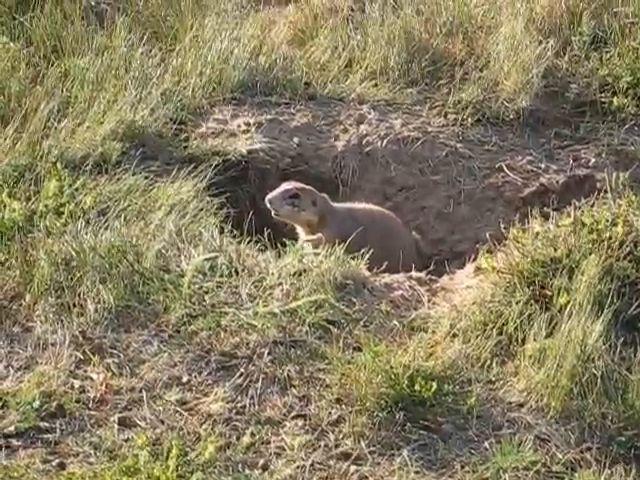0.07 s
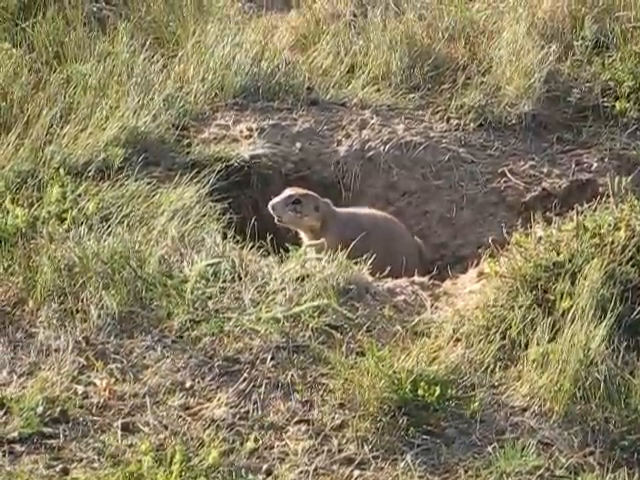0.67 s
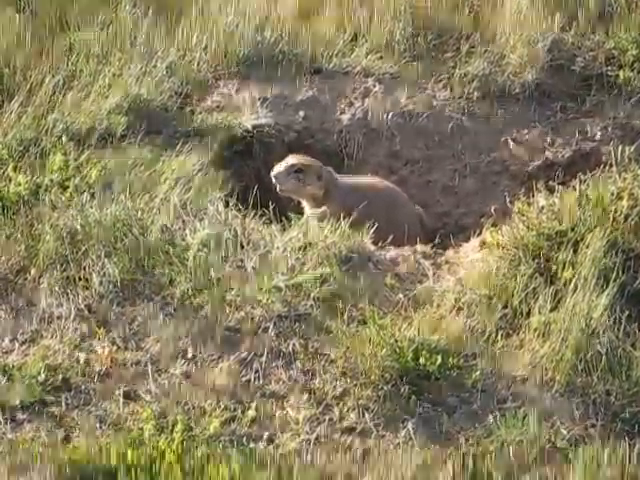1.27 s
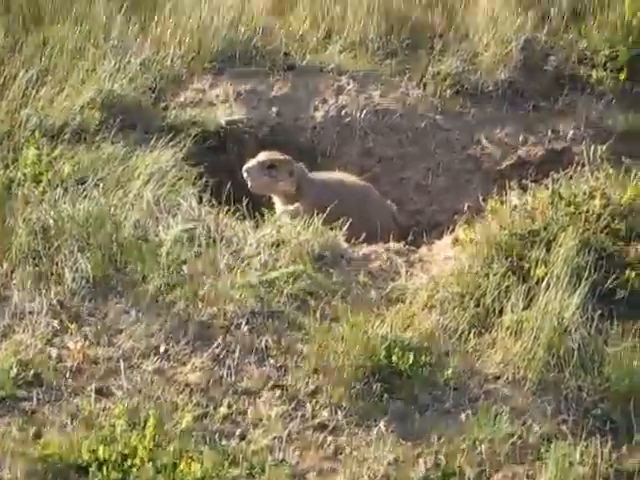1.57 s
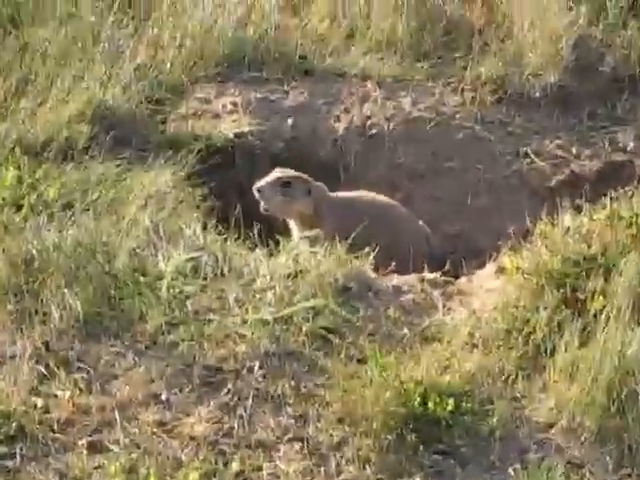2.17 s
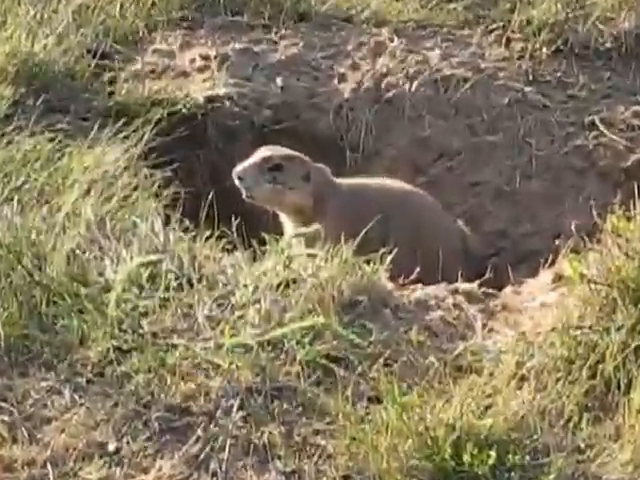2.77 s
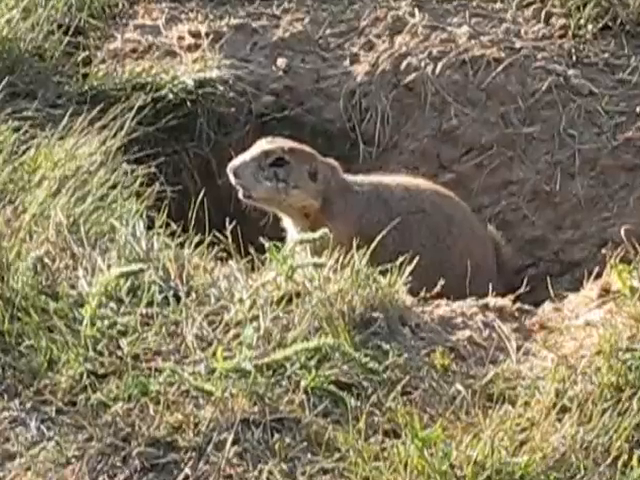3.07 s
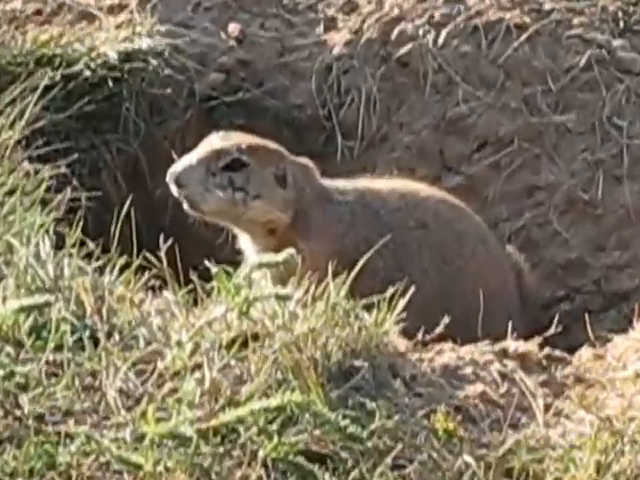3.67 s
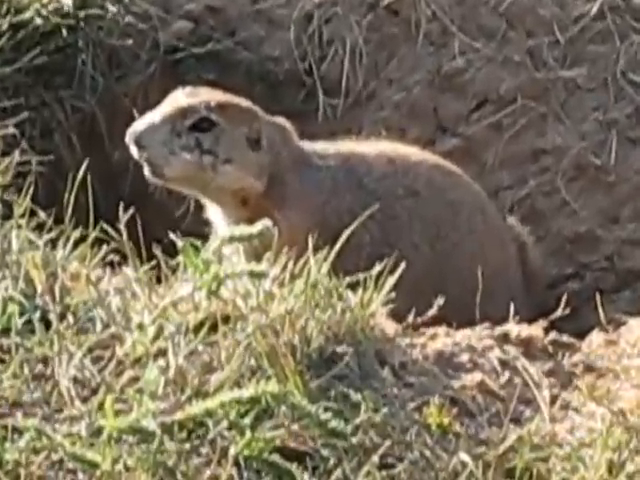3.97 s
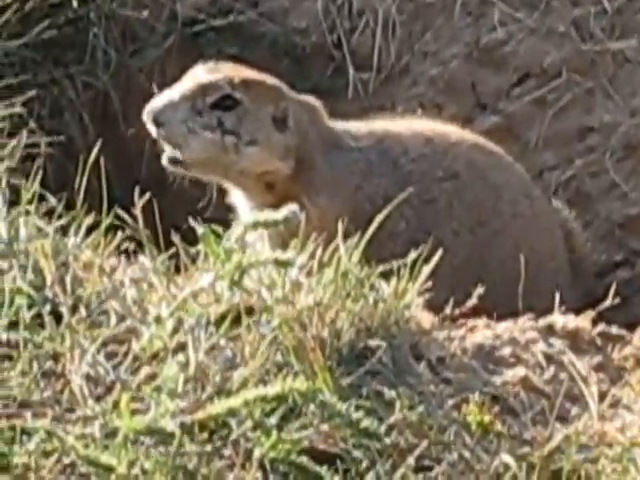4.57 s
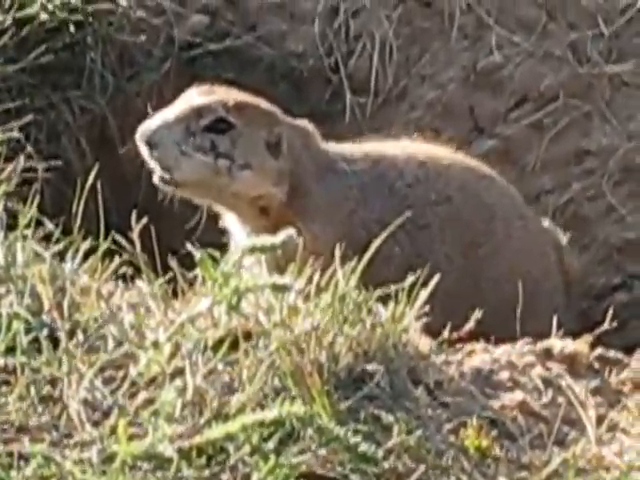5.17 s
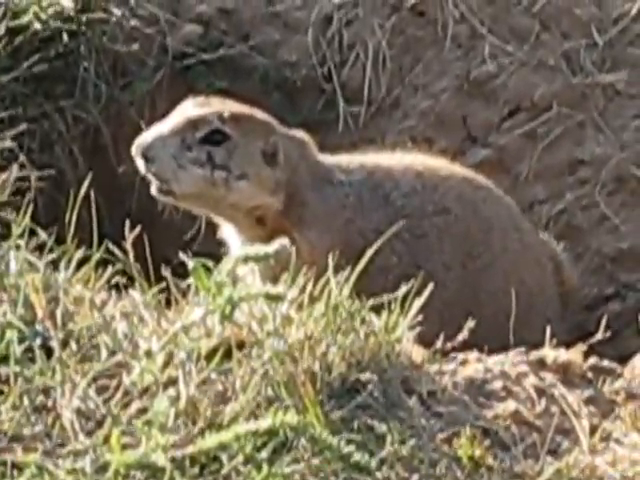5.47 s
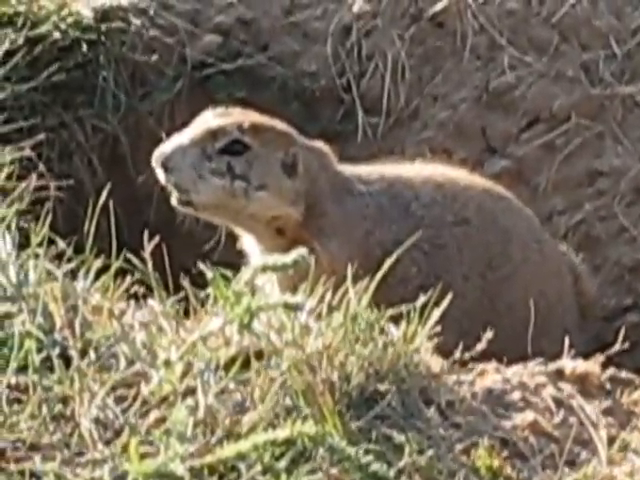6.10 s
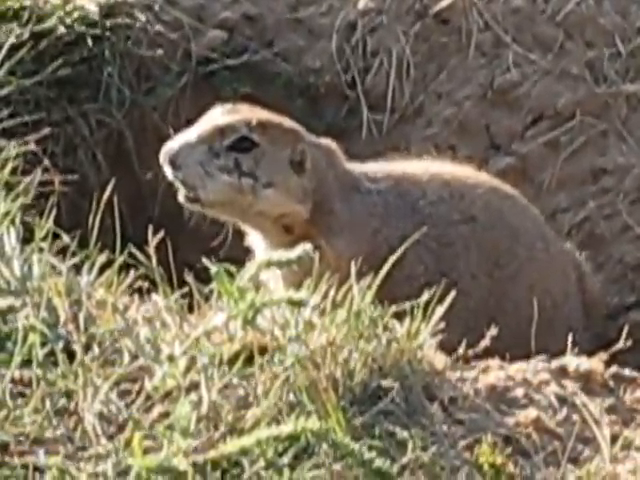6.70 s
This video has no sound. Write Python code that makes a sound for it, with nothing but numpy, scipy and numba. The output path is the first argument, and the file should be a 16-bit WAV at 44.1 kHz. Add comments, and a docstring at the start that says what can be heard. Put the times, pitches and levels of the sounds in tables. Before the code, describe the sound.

Gusty wind rumbles and bumps against a hand-held camera's microphone in a grassy field, then gradually dies down. Throughout, two prairie dogs at a burrow exchange short, high-pitched barks, one rough and one clean, with a slight outdoor echo. Early on there is a soft dry scuff, then a close click and rub from the camera. Barely audible crickets sit behind the wind.

```python
"""Prairie dogs in the wind

Two prairie dogs bark in turn at a burrow: one in clear, arched yips, the other with a fluttering rasp.
Wind rushes over the grassland and thumps on the microphone; two crickets trill faintly with their wings.
The hand-held camera clicks and zooms, and there is one dry scuff.
The camera's limiter flattens the barks and its filter cuts a notch in the treble."""
import sys
import numpy as np
from scipy import signal
from scipy.fft import rfft, irfft
from scipy.io import wavfile
from scipy.ndimage import uniform_filter1d
from numba import njit

SR = 44100
rng = np.random.default_rng(int(sys.argv[2]) if len(sys.argv) > 2 else 0)


def log_audio(samples):
    """Write samples as a 16-bit WAV file to the path given in sys.argv[1]."""
    # one column per channel
    frames = np.atleast_2d(samples).T
    # limit to full scale, then quantise
    limited = np.clip(frames, -1, 1)
    pcm = np.round(limited * 32767).astype(np.int16)
    wavfile.write(sys.argv[1], SR, pcm)


N = 301644
TIME = np.arange(N) / SR

# wind over the grassland, swelling once and dying down: t/s, level/dB
BREEZE_LEVEL = [(0, -34), (1.85, -32.5), (2.3, -34), (3, -36), (3.6, -39), (4.7, -41.5), (5.3, -42.5),
                (6.2, -41.5), (6.84, -45.5)]
# colours of the wind bed: f/Hz, level/dB
RUSH_COLOUR = [(200, -8), (380, -9.5), (600, 0.5), (880, 7), (1150, 0.5), (1500, 3), (1800, -2.5),
               (2200, -12.5), (2800, -17), (4500, -27.5), (7000, -43), (12000, -59)]  # body of the rush in the grass
SWELL_COLOUR = [(1100, -16), (1450, 6), (1780, 4), (2050, -9), (2400, -8), (3200, -36), (7000, -34)]  # its bright edge, which grows fastest in a swell
HISS_COLOUR = [(1500, 2), (4500, -2), (6700, 1), (8500, -5.5), (10000, -4.5), (12500, -7), (17000, -14)]  # steady hiss
RUMBLE_COLOUR = [(15, 0), (30, -16.5), (60, -5.5), (100, -13.5), (150, -23.5), (300, -41)]  # light air on the microphone
BUFFET_COLOUR = [(20, -8.5), (55, -3.5), (110, 0), (200, -8.5), (350, -15), (600, -22), (1200, -62)]  # turbulence on the microphone
# gusts at the microphone: t/s, level/dB
GUST_LEVEL = [(0, -19), (.2, -29.5), (.65, -30.5), (.99, -24.5), (1.35, -32), (1.6, -36), (2.1, -33),
              (2.45, -44.5), (3, -39), (3.55, -34), (3.9, -41), (4.7, -42), (4.97, -30.5), (5.3, -33),
              (5.45, -44), (6.1, -53.5), (6.84, -54)]
# the strongest eddies that thump on the microphone: t/s, level/dB, f/Hz
EDDY_THUMPS = [(.032, -13.5, 112), (.064, -4.5, 302), (.414, -10.5, 278), (.482, -8, 323),
               (.556, -5.5, 336), (.587, -9, 273), (.614, -11, 290), (.778, -7, 222), (.868, -7, 282),
               (.935, -4, 303), (.989, -5, 151), (1.132, -4.5, 302), (1.183, -8, 225), (1.337, -5, 260),
               (1.461, -5.5, 303), (1.498, -2, 330), (1.725, -7, 172), (1.952, -9.5, 315), (2.158, -7, 295),
               (2.281, -5, 460), (2.621, -12, 308), (2.827, -11, 150), (2.94, -12, 132),
               (2.971, -11.5, 230), (3.11, -11, 218), (3.17, -12.5, 187), (3.522, -10.5, 200),
               (3.576, -11.5, 191), (3.599, -8, 307), (3.913, -18, 116), (4.837, -12.5, 323),
               (4.989, -11, 170), (5.055, -13, 240), (5.102, -11.5, 360), (5.216, -13, 228),
               (5.347, -10, 182), (5.639, -15.5, 202), (6.33, -24.5, 206), (6.714, -25, 139)]
# rests of the higher cricket: start/s, end/s
TRILL_RESTS = [(.7, 2), (5.3, 6.48)]
# rasping barks: t/s, length/s, top f/Hz, place of the top/0-1, level/dB, brightness/(dB per octave),
# flutter/Hz, late pitch drop/0-1
RASP_CALLS = [(.133, 0.066, 1860, 0.31, -15, -0.5, 210, 0.14),
              (0.672, 0.075, 1786, 0.31, -18.5, 1, 234, .02), (1.676, 0.074, 1787, .41, -19, .5, 176, 0.03),
              (2.529, .074, 1800, 0.39, -18.5, -1, 188, 0), (3.048, 0.077, 1740, 0.34, -19, 0, 207, 0),
              (3.604, .076, 1773, 0.32, -18, -1.5, 224, 0), (4.57, 0.069, 1752, .4, -18.5, 1, 190, 0.01),
              (5.474, 0.072, 1704, 0.42, -17.5, 0, 263, 0.06), (6.154, 0.072, 1747, 0.32, -19, -1, 186, 0),
              (6.809, 0.09, 1738, 0.2, -19, 0, 194, 0)]
# clear yips: t/s, length/s, top f/Hz, place of the top/0-1, level/dB, brightness/(dB per octave)
YIP_CALLS = [(0.486, 0.062, 1885, 0.22, -19.5, 5.5), (1.503, 0.066, 1850, 0.5, -18.5, 4),
             (2.167, 0.068, 1938, 0.29, -20, 9.5), (3.256, 0.064, 1860, 0.31, -20, 3.5),
             (4.102, 0.069, 1871, 0.48, -17.5, 7.5), (4.629, 0.074, 1747, 0.37, -19, 0),
             (5.093, 0.067, 1854, 0.32, -19, 4.5), (5.711, 0.068, 1791, 0.35, -20, 0.5),
             (6.414, 0.066, 1790, 0.35, -19, -0.5)]
# throat and mouth resonances of each animal: f/Hz, level/dB
RASP_FORMANTS = [(1700, -23.5), (2400, -7.5), (3000, -8.5), (3550, 0), (4200, -9.5), (5200, -3.5),
                 (5900, -2), (7000, -9.5), (8700, -15.5), (10000, -32.5), (13500, -37.5), (16000, -78)]
YIP_FORMANTS = [(1400, -27), (1800, -4), (2600, 3), (2950, 11), (3150, 0), (3550, 9.5), (4150, 14),
                (4550, -16), (5400, -7), (6200, -5.5), (7100, -5), (9000, -27), (11000, -35.5),
                (15000, -69)]
# clicks of the camera body: t/s, peak level/dB, decay/s
CAMERA_CLICKS = [(.989, -32, 0.00085), (1.270, -32, 0.0018), (1.333, -27, 0.0068), (1.8334, -3.5, 0.00025),
                 (1.9067, -30, 0.0006), (3.925, -32, 0.00074), (4.413, -41, 0.0033), (6.702, -41, .001)]
# colour of the camera's shell: f/Hz, level/dB
SHELL_COLOUR = [(800, -15), (1800, -4.5), (3000, -9.5), (5000, -7.5), (6700, 3.5), (8300, -12), (9700, -3),
                (11500, -13.5), (14000, -17), (17000, -34)]
# colour of the dry scuff: f/Hz, level/dB
SCUFF_COLOUR = [(2200, -25), (3000, -6), (3900, 8), (4700, -11), (5400, -4), (6400, -20), (12000, -29)]
# fingers and zoom barrel rubbing: t/s, length/s, level/dB, place of the top/0-1, tilt/(dB per octave)
CAMERA_RUBS = [(1.298, 0.088, -53, 0.27, 14), (1.846, 0.067, -22.5, 0.8, -6),
               (3.477, 0.49, -53.5, .6, -2.5)]


def undb(db):
    """Decibels to gain."""
    return 10 ** (np.asarray(db) / 20)


def unit(x):
    """Scale to rms 1."""
    return x / np.sqrt(np.mean(x ** 2))


def shape_db(colour, hz):
    """Read an EQ curve on a log-frequency axis; it rolls off steeply beyond its ends."""
    f, db = np.transpose(colour)
    octave = np.log2(np.maximum(hz, 1))
    outside = np.abs(octave - np.clip(octave, np.log2(f[0]), np.log2(f[-1])))
    return np.interp(octave, np.log2(f), db) - 20 * outside


def noise(colour, tilt_db=0, size=N):
    """Coloured noise, tilted by tilt_db per octave, rms 1."""
    hz = np.arange(size // 2 + 1) * SR / size
    gain = undb(shape_db(colour, hz) + tilt_db * np.log2(np.maximum(hz, 20)))
    return unit(irfft(rfft(rng.standard_normal(size)) * gain, size))


def wander(rate_hz, size=N):
    """Smooth random modulation with a spread near 1."""
    hold = max(int(SR / rate_hz), 2)
    steps = np.repeat(rng.standard_normal(size // hold + 2), hold)
    return np.sqrt(2) * uniform_filter1d(uniform_filter1d(steps, hold), hold)[:size]


def add(out, start_s, sound):
    """Mix a sound in at its cue."""
    i = max(int(start_s * SR), 0)
    out[i:i + len(sound)] += sound[:max(N - i, 0)]


def grass_rush():
    """Wind rushes over open ground, brighter as it swells, above a smooth hiss."""
    breeze_db = np.interp(TIME, *np.transpose(BREEZE_LEVEL))
    waver_db = .7 * wander(12)
    body = noise(RUSH_COLOUR)
    edge = noise(SWELL_COLOUR) * undb(-9 + 1.67 * (breeze_db + 37.5))
    return undb(breeze_db + 2 + waver_db) * (body + edge) + undb(-60) * noise(HISS_COLOUR)


def air_rumble():
    """Light air never stops moving over the microphone: a low, wavering bed."""
    return undb(-39.5 + 4 * wander(24)) * noise(RUMBLE_COLOUR)


def lesser_eddies(gust_db, per_s=16, over_gust_db=15, spread_db=5, centre_hz=176, spread_octaves=.57):
    """Chance eddies, each as strong as the gust that carries it: t/s, level/dB, f/Hz."""
    gap, strength, pitch = rng.uniform(-1, 1, size=(150, 3)).T
    times = np.cumsum(1 + .8 * gap) / per_s
    db = np.interp(times, TIME, gust_db) + over_gust_db + spread_db * strength
    hz = centre_hz * 2 ** (spread_octaves * pitch)
    return [eddy for eddy in zip(times, db, hz) if eddy[0] < TIME[-1]]


def buffeting(swing_cycles=.32, wake_db=-10, wake_s=.01):
    """Turbulence hits the microphone in patches, brighter when stronger; eddies thump in ragged wakes."""
    gust_db = np.interp(TIME, *np.transpose(GUST_LEVEL))
    flow = noise(BUFFET_COLOUR)
    lows = signal.sosfiltfilt(signal.butter(2, 130, fs=SR, output="sos"), flow)
    lows_db = 4 * wander(90)
    highs_db = 1.3 * lows_db + .45 * (gust_db + 36) - 4.5
    out = undb(gust_db - 1) * (lows * undb(lows_db) + (flow - lows) * undb(highs_db))
    t = np.arange(-1500, 1500) / SR
    for start, db, hz in list(EDDY_THUMPS) + lesser_eddies(gust_db):
        # pressure flips between push and suction as the eddy passes the port
        skew = np.exp(.5j * rng.standard_normal())
        swing = np.imag(skew / (1 + 1j * t * hz / swing_cycles) ** 2.25)
        wake_colour = [(70, 0), (1.22 * hz, 0), (3 * hz, -14), (6 * hz, -36)]
        wake = noise(wake_colour, size=len(t)) * np.exp(-(t / wake_s) ** 2)
        add(out, start + t[0], undb(db) * (swing + undb(wake_db) * wake))
    return out


def trill(centre_hz, swing_hz, stroke_hz, db):
    """Each wing stroke sounds a thin, unsteady tone that arches in pitch, highest and loudest at the peak of
    the stroke."""
    stroke = np.sin(2 * np.pi * np.cumsum(stroke_hz * (1 + .0141 * wander(7.7))) / SR)
    hz = centre_hz + swing_hz * stroke + 40 * wander(900)
    tone = np.sin(2 * np.pi * np.cumsum(hz) / SR)
    return undb(db + 2 * wander(5.8)) * np.maximum(stroke, 0) ** 2 * tone


def crickets(fade_db_per_s=3):
    """Two faint crickets in the grass: the higher one rests twice, the lower one fades away."""
    singing = np.all([(TIME < start) | (TIME > end) for start, end in TRILL_RESTS], axis=0)
    high = trill(centre_hz=7880, swing_hz=380, stroke_hz=17, db=-55.5)
    low = trill(centre_hz=6150, swing_hz=475, stroke_hz=11.6, db=-51.5)
    return singing * high + low * undb(-fade_db_per_s * TIME)


def pitch_arch(length_s, top_at, rise, rise_power, fall, fall_power):
    """Sag of a call's pitch below its top, 0-1: it shoots up, levels off and falls ever faster."""
    course = np.linspace(0, 1, int(length_s * SR))
    before = np.maximum(1 - course / top_at, 0)
    after = np.maximum((course - top_at) / (1 - top_at), 0)
    return rise * before ** rise_power + fall * after ** fall_power


def bark(sag, top_hz, bright_db, formants, flutter_hz, drop,
         flutter, sway, jitter, breath_db, db_per_sag, attack_s, release_s):
    """Pitch and effort arch together while the harmonics slide through the throat's resonances."""
    size = len(sag)
    t, course = np.arange(size) / SR, np.linspace(0, 1, size)
    effort_db = db_per_sag * sag
    # past the top the voice may crack to a lower, weaker register
    crack = drop * np.exp(-((course - .69) / .0665) ** 2)
    # a second, slower vibration chokes the vocal folds, and the pitch dips at each choke
    flutter_cycles = np.cumsum(flutter_hz * (1 + .1 * wander(187, size))) / SR
    depth = np.clip(flutter * (1 + .32 * wander(142, size)) * (1.3 - 1.2 * course), 0, 1)
    choke = depth * np.sin(np.pi * flutter_cycles) ** 4
    hz = top_hz * (1 - sag) * (1 - crack - sway * (choke - choke.mean()) + jitter * wander(1500, size))
    phase = 2 * np.pi * np.cumsum(hz) / SR
    # weak effort closes the folds softly, which dulls the upper harmonics
    harmonics = np.arange(1, 10)[:, None]
    tilt_db = (bright_db + .95 * effort_db) * np.log2(np.maximum(harmonics / 2, 1))
    gains = undb(shape_db(formants, harmonics * hz) + tilt_db)
    voice = np.sqrt(2) * np.sum(gains * np.sin(harmonics * phase), axis=0) * undb(-100 * crack)
    # breath hisses once a cycle, most while the folds are choked
    puffs = (1 + np.cos(phase)) * (1 + 4 * choke)
    breath = undb(breath_db - .79 * effort_db) * noise(formants, tilt_db=3.5, size=size) * puffs
    fades = np.clip(np.minimum(t / attack_s, (t[-1] - t) / release_s), 0, 1)
    return (voice * (1 - choke) + breath) * undb(effort_db) * fades


def grassland_echo(x, scatter_db, echo_db, t60_s, delay_s=.086, spread_s=.0079):
    """Grass and mounds scatter a faint tail; a bank further off returns a cluster of echoes."""
    t = np.arange(SR // 2) / SR
    scatter = rng.standard_normal(len(t)) * undb(-60 * t / t60_s) * (t > .004)
    response = undb(scatter_db) * unit(scatter) / np.sqrt(len(t))
    for order, offset in enumerate(rng.uniform(-1, 1, size=5), start=1):
        response[int((delay_s + spread_s * offset) * SR)] += undb(echo_db) / order
    return signal.fftconvolve(x, response)[:N]


def rasping_prairie_dog():
    """Deep flutter in the vocal folds roughens each bark, and the grassland echoes it."""
    out = np.zeros(N)
    for start, length, hz, top_at, db, bright_db, flutter_hz, drop in RASP_CALLS:
        sag = pitch_arch(length, top_at, rise=.1262, rise_power=2.1, fall=.3, fall_power=3.4)
        call = bark(sag, hz, bright_db, RASP_FORMANTS, flutter_hz, drop, flutter=.6, sway=.055,
                    jitter=.0061, breath_db=-26, db_per_sag=-52, attack_s=.0062, release_s=.004)
        add(out, start, undb(db) * call)
    return out + grassland_echo(out, scatter_db=-28.5, echo_db=-36, t60_s=.31)


def yipping_prairie_dog():
    """Evenly vibrating folds give clear yips, with a drier echo from where this animal sits."""
    out = np.zeros(N)
    for start, length, hz, top_at, db, bright_db in YIP_CALLS:
        sag = pitch_arch(length, top_at, rise=.226, rise_power=2.9, fall=.26, fall_power=1.95)
        call = bark(sag, hz, bright_db, YIP_FORMANTS, flutter_hz=250, drop=0, flutter=.02, sway=.02,
                    jitter=.004, breath_db=-27, db_per_sag=-85.5, attack_s=.0011, release_s=.0027)
        add(out, start, undb(db) * call)
    return out + grassland_echo(out, scatter_db=-30, echo_db=-47, t60_s=.11)


def camera_clicks(ring_hz=5600, ring_decay_s=.00028):
    """The camera body clicks: a snap of noise and a quick ring of its shell."""
    out = np.zeros(N)
    t = np.arange(1024) / SR
    ring = 2 * np.sin(2 * np.pi * ring_hz * t) * np.exp(-t / ring_decay_s)
    for start, db, decay in CAMERA_CLICKS:
        click = ring + noise(SHELL_COLOUR, tilt_db=1.5, size=len(t)) * np.exp(-t / decay)
        add(out, start, undb(db) * click / np.abs(click).max())
    return out


def scuff(start_s=1.175, length_s=.095, db=-39):
    """One soft, dry scuff with two resonances."""
    out, size = np.zeros(N), int(length_s * SR)
    envelope = undb(db + 2 * wander(350, size)) * np.hanning(size)
    add(out, start_s, envelope * noise(SCUFF_COLOUR, size=size))
    return out


def camera_rubs():
    """Fingers and the zoom barrel rub: grainy friction, coloured by the shell, swells and stops."""
    out = np.zeros(N)
    for start, length, db, top_at, tilt_db in CAMERA_RUBS:
        size = int(length * SR)
        swell_db = np.interp(np.linspace(0, 1, size), [0, top_at, 1], [-24, 0, -9])
        grain_db = 2 * wander(600, size)
        add(out, start, undb(db + swell_db + grain_db) * noise(SHELL_COLOUR, tilt_db, size))
    return out


def scene():
    """Mono mix: a bed of wind and crickets, the two animals, and small noises up close."""
    bed = grass_rush() + air_rumble() + buffeting() + crickets()
    barks = rasping_prairie_dog() + yipping_prairie_dog()
    return (bed + barks + camera_clicks() + scuff() + camera_rubs())[None]


def record(dry, notch_hz=7890, notch_width_hz=530, ceiling=.14, top_hz=17300):
    """The camera's chain: a steep treble notch, a quick limiter and a high cut."""
    notch = signal.iirnotch(notch_hz, notch_hz / notch_width_hz, fs=SR)
    notched = signal.lfilter(*notch, signal.lfilter(*notch, dry[0]))
    level = follow_level(notched, attack_s=.004, release_s=.007)
    limited = notched * np.minimum(1, ceiling / (level + 1e-9))
    high_cut = signal.ellip(8, .2, 70, top_hz, fs=SR, output="sos")
    return signal.sosfilt(high_cut, limited)[None]


@njit
def follow_level(x, attack_s, release_s):
    """The limiter's envelope follower, rising and falling at different speeds."""
    out, level = np.empty(len(x)), 0.
    for i in range(len(x)):
        gap = abs(x[i]) - level
        level += gap / (SR * (attack_s if gap > 0 else release_s))
        out[i] = level
    return out


dry = scene()
out = record(dry)
log_audio(out)
```